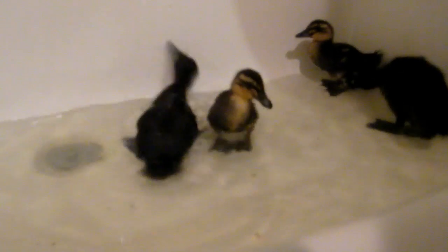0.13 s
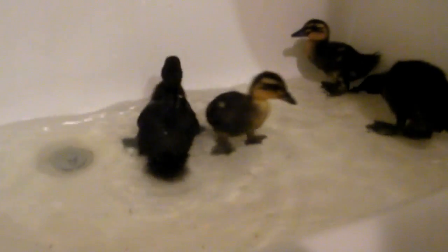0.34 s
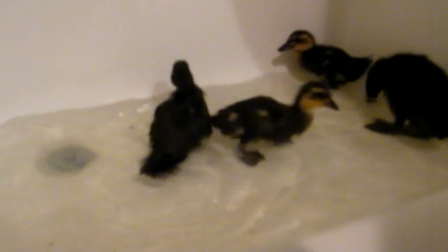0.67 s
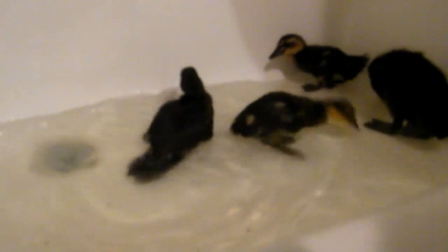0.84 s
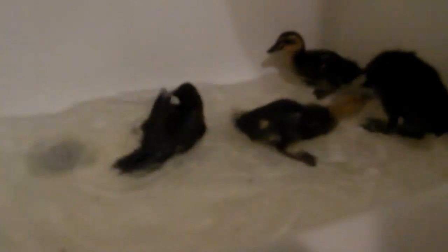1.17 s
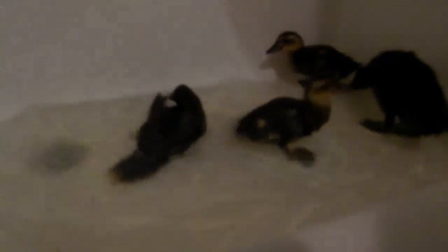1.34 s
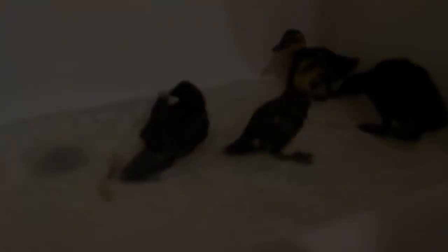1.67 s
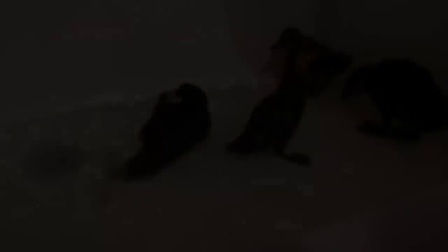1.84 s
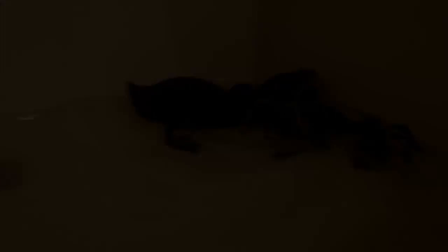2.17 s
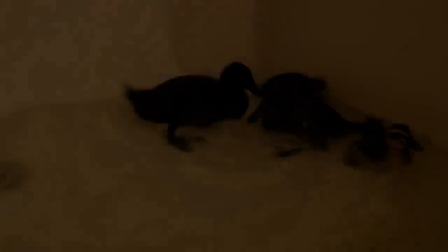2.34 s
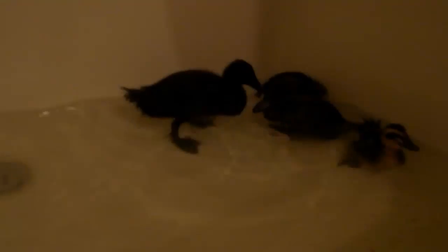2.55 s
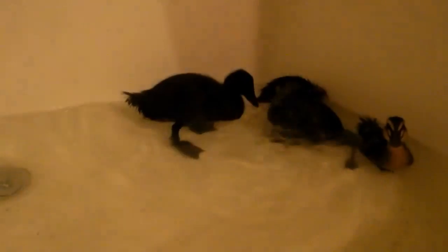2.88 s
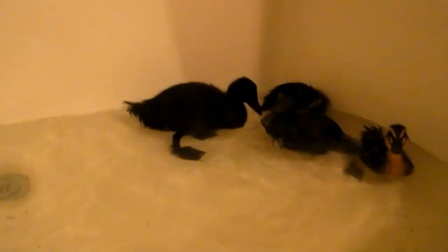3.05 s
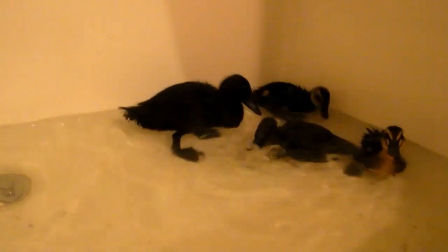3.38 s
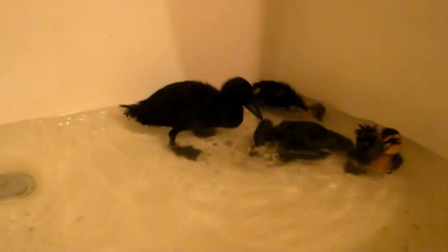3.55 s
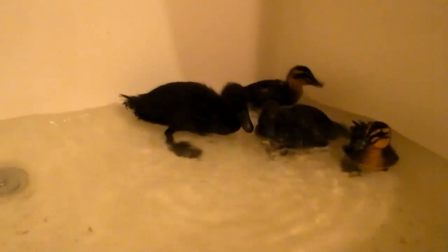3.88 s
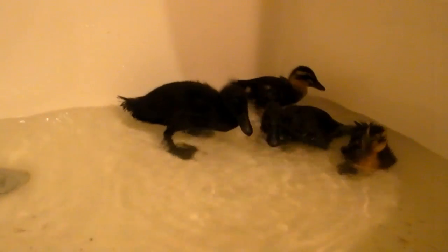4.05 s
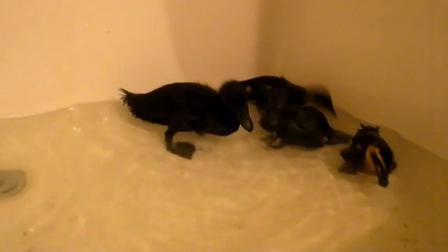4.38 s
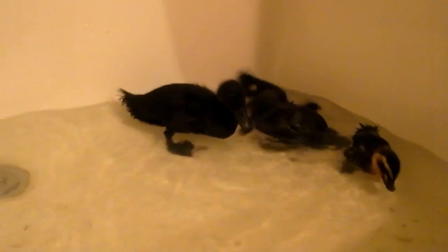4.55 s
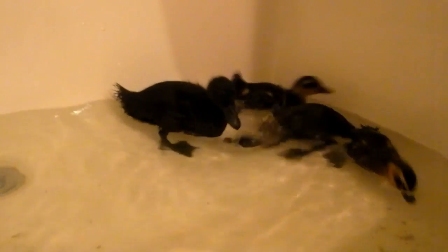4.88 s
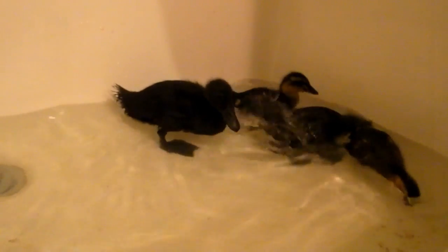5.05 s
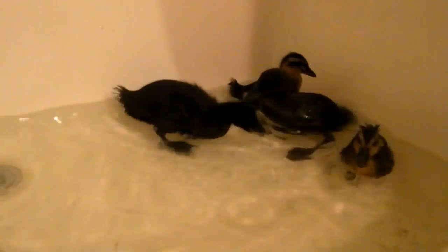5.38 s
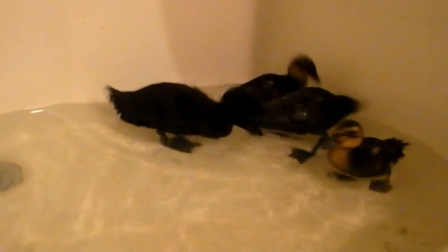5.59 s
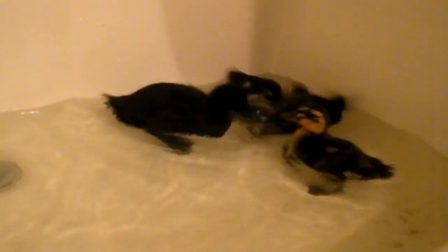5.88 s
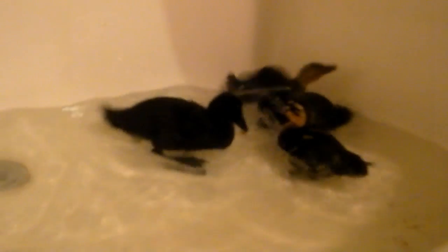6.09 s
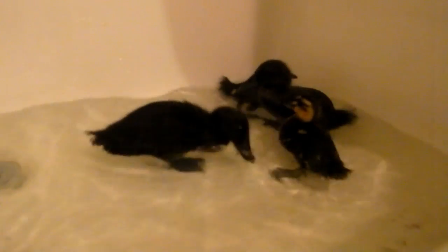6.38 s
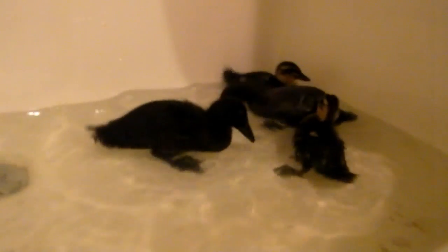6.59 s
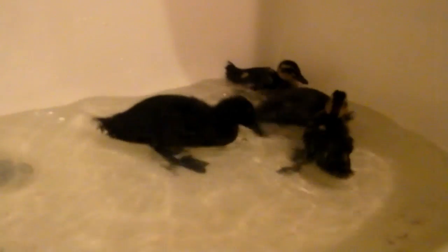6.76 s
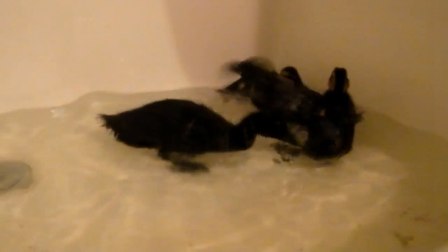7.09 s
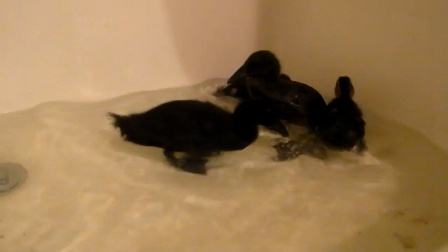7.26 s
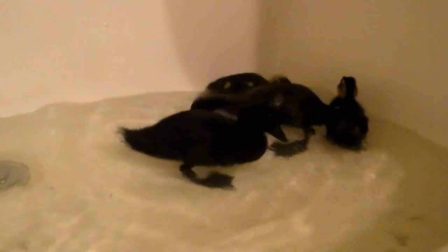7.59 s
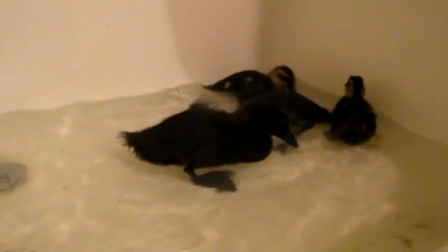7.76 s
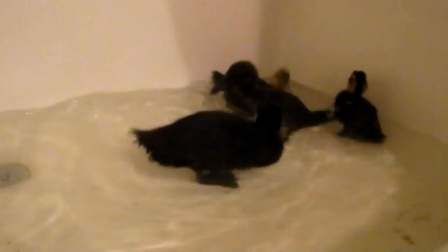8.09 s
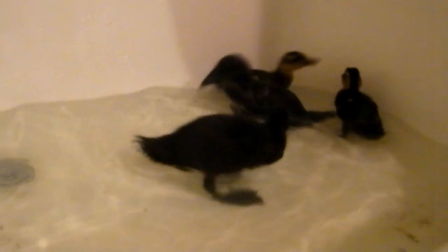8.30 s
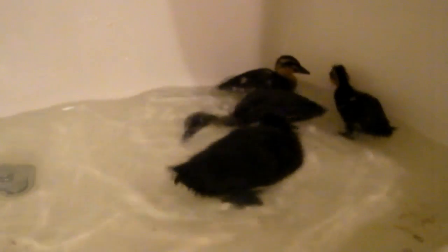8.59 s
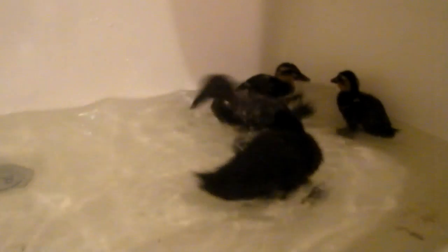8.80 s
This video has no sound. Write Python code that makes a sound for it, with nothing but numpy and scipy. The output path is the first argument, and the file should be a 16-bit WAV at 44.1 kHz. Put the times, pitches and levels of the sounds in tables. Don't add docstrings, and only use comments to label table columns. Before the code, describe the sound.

A bath tap gushes brightly into a shallow tub and fades out, then after a brief hush ducklings paddle with scattered drips, plops and splashes.

```python
import sys
import numpy as np
from scipy import signal
from scipy.fft import rfft, irfft
from scipy.io import wavfile

SR = 44100
rng = np.random.default_rng(int(sys.argv[2]) if len(sys.argv) > 2 else 0)


def makeup_ratio(level_db):
    decades = np.asarray(level_db, float) / 20
    return 10 ** decades


def dump_mix(stems):
    frames = np.atleast_2d(stems).T
    limited = np.clip(frames, -1, 1)
    pcm = np.round(limited * 32767).astype(np.int16)
    wavfile.write(sys.argv[1], SR, pcm)


N = 393813

# [t/s, level/dB]
STREAM_LEVEL = [
    (0.0, -15.5),
    (0.25, -18),
    (0.35, -19),
    (0.83, -20),
    (1.73, -30),
    (1.95, -39),
    (2.08, -55.5),
]
# [f/Hz, density/dB per Hz]
STREAM_COLOUR = [(35, -57), (60, -35.5), (96, -1.5), (130, -33), (160, -11), (398, -10), (458, -6),
                 (1200, -6), (1620, -8.5), (1950, -6.5), (2580, -5), (4220, -5), (4750, -4.5), (6000, 4),
                 (16000, -44)]
# [f/Hz, width/Hz, added level/dB]
TUB_RINGS = [(1650, 160, 0), (2520, 260, -3.5), (3960, 570, -2.5)]
# [t/s, peak level/dB, f/Hz]
STREAM_BUBBLES = [
    (0.146, -8.5, 2530),
    (0.163, -12.5, 2820),
    (0.318, -23, 3830),
    (0.544, -38, 1750),
    (0.733, -16, 1590),
    (0.832, -19, 3840),
    (1.396, -28, 1090),
]
# [t/s, peak level/dB, f/Hz]
STREAM_SPITS = [(0.0287, -11, 5990), (0.0471, -18, 5600), (0.059, -6.5, 5790), (0.0903, -8, 6380),
                (0.1173, -12.5, 6400), (0.198, -6, 6220), (0.2229, -9, 6200), (0.2389, -12, 6140),
                (0.2562, -11, 5800), (0.2704, -8, 6360), (0.297, -10, 5840), (0.3951, -19, 6020),
                (0.477, -8.5, 6250), (0.493, -23, 6150), (0.5036, -21, 6230), (0.5642, -18, 6450),
                (0.5765, -14, 6070), (0.5906, -9, 6180), (0.6251, -15, 6600), (0.654, -12.5, 6180),
                (0.7135, -11, 5670), (0.7428, -15, 6500), (0.7776, -27, 5820), (0.81, -15.0, 6100),
                (0.8323, -12, 5840), (0.861, -15.5, 5660), (0.9434, -20, 6020), (0.965, -17.5, 6000),
                (1.0398, -15, 5830), (1.1303, -11.5, 5570), (1.1974, -15, 5940), (1.2245, -14, 6300),
                (1.2433, -19.5, 5970), (1.3784, -14.5, 6300), (1.3943, -18, 6230), (1.409, -21, 6300),
                (1.4294, -17, 6340), (1.548, -17, 6180), (1.5696, -20, 5800), (1.6157, -22, 6160),
                (1.646, -25.5, 6550), (1.7598, -24, 6100), (1.8303, -25, 6270), (1.9974, -36, 6360)]
# [t/s, peak level/dB, f/Hz, ring/s]
BEADS = [(2.625, -25, 900, .012), (3.1303, -30, 6500, 0.0055), (3.2248, -35, 3540, 0.013),
         (3.355, -28.0, 6600, 0.0097), (3.4838, -13, 6000, 0.0072), (3.5054, -21, 5970, 0.0068),
         (3.594, -19.5, 5270, 0.0127), (3.57, -23, 2660, 0.0068), (3.6609, -25, 3630, 0.0068),
         (3.677, -16.5, 5650, 0.0034), (3.7044, -31, 3600, 0.016), (3.7596, -33, 1760, 0.016),
         (3.8209, -39.5, 1404, 0.025), (3.8636, -34, 2900, 0.0069), (4.0865, -20.5, 5170, 0.0063),
         (4.1807, -22.5, 7670, 0.0018), (4.2406, -35.0, 6600, 0.009), (4.3257, -44.5, 2940, 0.013),
         (4.4312, -31.5, 3860, 0.0046), (4.4831, -42.5, 6560, 0.0049), (4.5459, -48, 6520, 0.012),
         (4.6692, -20.5, 6610, 0.0055), (4.9204, -34, 2460, 0.017), (4.9589, -37, 6690, 0.0056),
         (5.011, -25, 6400, 0.0044), (5.0252, -41, 2970, 0.0058), (5.15, -45, 3180, 0.029),
         (5.2496, -35.5, 2080, 0.013), (5.2619, -33.5, 3630, 0.015), (5.365, -38.5, 3030, 0.02),
         (5.3966, -11, 7390, 0.004), (5.985, -29, 8800, 0.0037), (6.1161, -30, 2060, 0.013),
         (6.4437, -28, 8600, 0.0034), (6.8808, -8, 5930, 0.0028), (6.8965, -25, 3390, 0.0093),
         (6.9297, -20, 3760, 0.0044), (6.9885, -12, 3680, 0.0061), (7.0183, -39, 4430, 0.0099),
         (7.1115, -26, 2880, 0.0065), (7.197, -41, 3770, 0.0094), (7.584, -9, 6070, 0.0012),
         (7.7825, -39, 2160, 0.017), (8.039, -34, 1670, 0.0163), (8.123, -28.5, 2800, 0.0055),
         (8.2066, -35.0, 1410, 0.011), (8.6524, -37.0, 1560, 0.01), (8.6939, -39, 2145, 0.0164),
         (8.8218, -26.5, 3370, 0.005), (8.9072, -33, 2400, 0.0087)]
# [t/s, peak level/dB]
PRICKS = [(2.297, -38), (2.536, -40), (3.2055, -22), (3.4016, -9), (3.829, -35), (3.911, -32), (3.98, -37),
          (6.9665, -27), (8.079, -15), (8.28, -34), (8.424, -35), (8.651, -31), (8.711, -31), (2.6339, -40),
          (2.8404, -40), (2.8569, -40), (3.0076, -25), (3.5763, -30), (3.7454, -37), (3.7589, -21),
          (4.783, -22), (5.01, -25), (5.0639, -35), (5.0799, -15), (5.1422, -16), (5.4261, -28),
          (5.4425, -25), (5.473, -23), (5.6226, -40), (5.8965, -27), (6.1035, -22), (6.1444, -24),
          (6.343, -40), (6.3859, -17), (6.4173, -19), (6.6588, -44), (6.8799, -10), (6.9264, -32),
          (7.1038, -25), (7.886, -34), (8.695, -28), (8.9141, -25)]
# [t/s, level/dB]
ROOM_LEVEL = [
    (2.17, -65),
    (2.7, -54),
    (3.3, -48),
    (4.6, -45.5),
    (8.93, -44.5),
]
# [f/Hz, level/dB]
WHINE = [(7732, -7), (15464, -17)]
# [f/Hz, density/dB per Hz]
HISS_COLOUR = [(100, 10), (978, 1), (2500, -19), (4600, -33), (5860, -6.5), (7900, -5), (8600, -19.5),
               (15300, -32)]
# [f/Hz, density/dB per Hz]
RUMBLE_COLOUR = [(8.8, -39), (15, 5.5), (54, 4), (91, 14.5), (124, -54), (156, -8), (200, -31), (260, -105)]
# [t/s, level/dB]
STIR_LEVEL = [(2.17, -70.5), (2.24, -45.5), (2.4, -63), (2.77, -43), (2.98, -49), (3.26, -35), (3.71, -31),
              (3.9, -51), (4.62, -48), (5.0, -33), (5.75, -36.5), (6.1, -30.5), (6.6, -60), (7.0, -25),
              (7.3, -50.5), (8.0, -47), (8.5, -51.5), (8.93, -38.5)]
# [f/Hz, density/dB per Hz]
RIPPLE_COLOUR = [(500, -25), (800, 0), (1500, 7), (3000, 8.5), (4500, 3.5), (5500, 8.5)]
# [f/Hz, density/dB per Hz]
FIZZ_COLOUR = [(2470, -34), (4200, -5), (4840, 15), (5180, -48), (6040, 21.5), (7240, 8), (13200, -12),
               (16300, -3)]
# [t/s, peak level/dB, f/Hz, ring/s]
BIG_BUBBLES = [(2.169, -44, 946, 0.016), (2.258, -40, 1110, 0.026), (2.615, -19, 968, 0.02),
               (3.003, -19, 1233, 0.0068), (3.403, -20.5, 1340, 0.0046), (3.491, -23.5, 1018, 0.018),
               (3.631, -35, 990, 0.037), (4.637, -11.5, 1110, 0.045), (4.934, -9, 783, 0.0064),
               (5.026, -21.5, 987, 0.02), (5.064, -9, 850, 0.0049), (3.674, -29, 1086, 0.031),
               (5.134, -17.5, 1310, 0.01), (5.507, -24, 1273, 0.016), (5.655, -12, 920, 0.0017),
               (5.852, -7, 697, 0.004), (5.969, -13, 831, 0.028), (6.387, -16.5, 1350, 0.0026),
               (6.474, -9, 1193, 0.023), (6.82, -22, 760, 0.0082), (6.841, -22, 1112, 0.054),
               (6.929, -14, 1690, 0.012), (6.987, -12, 1208, 0.032), (7.581, -14, 1126, 0.0038),
               (7.809, -10, 867, 0.0018), (8.036, -22.5, 950, 0.0061), (8.072, -13.5, 1490, 0.0039),
               (8.241, -16.5, 1350, 0.0041), (8.589, -19, 817, 0.016), (8.8915, -10.5, 1023, 0.012)]
# [t/s, peak level/dB, f/Hz, length/s]
SHOVES = [(2.244, -22, 5570, 0.033), (4.917, -28, 480, 0.09), (5.066, -32, 460, 0.12),
          (5.1, -34, 171, 0.037), (5.654, -22, 1540, 0.054), (5.847, -22, 510, 0.097),
          (5.85, -33.5, 164, .07), (5.862, -26.5, 300, 0.089), (6.825, -18.5, 294, 0.096),
          (6.829, -27.5, 170, 0.041), (6.846, -14, 670, 0.065), (7.349, -36.5, 153, 0.0432),
          (7.598, -22, 1090, 0.08), (7.696, -35.5, 239, 0.0378), (7.708, -30.5, 150, 0.043),
          (7.804, -15, 880, 0.11), (7.815, -22, 376, .12), (8.076, -13, 3370, 0.13),
          (8.12, -32.5, 156, 0.05), (8.122, -29, 336, .06), (8.587, -17, 490, 0.1), (8.59, -24, 300, .055),
          (8.661, -22.5, 316, 0.14), (8.666, -21, 750, 0.11), (8.668, -26, 1720, 0.039)]
# [t/s, peak level/dB, f/Hz, ring/s]
DROPS = [(2.219, -33, 1710, 0.0094), (2.8435, -23, 4000, 0.0045), (3.046, -30, 3830, 0.011),
         (3.083, -27.5, 2900, 0.013), (3.346, -21.5, 4300, .009), (3.4022, 4.5, 4100, 0.0016),
         (3.487, -15, 2730, 0.0054), (4.124, -16, 3100, 0.0027), (4.138, -23.5, 2086, 0.021),
         (4.208, -28.5, 1660, 0.032), (4.2162, -19, 3730, 0.0063), (4.4, -24, 3730, 0.009),
         (4.587, -31, 1910, 0.01), (4.8027, -11.5, 3570, 0.0025), (4.9012, -13, 3900, 0.0051),
         (4.9894, -25, 3880, .009), (5.339, -24.5, 4560, 0.023), (5.5065, -19, 2345, 0.027),
         (5.8974, -23.5, 2740, 0.014), (6.0769, -27.5, 2250, 0.022), (6.169, -25.5, 2450, 0.04),
         (6.4727, -8.5, 1740, 0.0073), (6.637, -29.5, 1684, 0.022), (7.272, -32, 2070, 0.011),
         (7.5833, -18.5, 1560, 0.0084), (7.9548, -10.5, 2215, 0.017), (8.829, -21.5, 2250, 0.038),
         (8.8935, -2.5, 2100, 0.0047)]
# [t/s, peak level/dB, f/Hz]
SPATTERS = [(3.0036, -38, 2030), (3.292, -15.5, 4560), (3.5697, -24, 2840), (3.634, -24, 2360),
            (3.6604, -15, 4600), (3.761, -20, 2880), (4.6387, -31, 1970), (8.312, -25, 5300),
            (8.33, -25, 5000), (5.506, -15, 3870), (5.6609, -27, 1830), (5.9585, -22, 4780),
            (6.112, -21, 3690), (6.385, -19.5, 4260), (6.818, -42, 2000), (6.8526, -20.5, 1490),
            (6.882, -13, 4860), (6.926, -18.5, 1720), (6.9848, -7.5, 3230), (7.1039, -26.5, 3080),
            (7.61, -23.5, 1690), (7.807, -31, 1920), (8.0693, -28, 2670), (8.126, -27, 2930),
            (8.2417, -34, 1980), (8.585, -28.5, 1800), (8.822, -24.5, 3140)]
# [t/s, peak level/dB, f/Hz]
DROPLETS = [(2.646, -31.5, 6020), (2.754, -22.5, 6500), (3.0095, -25, 5630), (3.203, -20, 5500),
            (3.2845, -23.5, 5500), (3.4867, -16.5, 5820), (3.573, -16, 5700), (3.594, -29, 5070),
            (3.674, -17.5, 5060), (3.8564, -19.5, 6240), (4.0762, -19, 5400), (4.283, -24, 5470),
            (4.67, -26, 6750), (5.012, -30, 6200), (5.105, -20, 6560), (5.1428, -16.5, 5800),
            (5.267, -26, 5600), (5.506, -15.5, 5940), (6.074, -31, 5100), (6.1128, -17, 5880),
            (6.42, -10.5, 5400), (6.471, -31, 6340), (6.947, -15, 5960), (7.011, -22, 6360),
            (7.11, -21.5, 6060), (7.888, -27, 7500), (8.3056, -25, 5900), (8.8405, -16.5, 6300),
            (8.891, -19, 5640)]
# [t/s, peak level/dB, f/Hz, snap level/dB]
BURSTS = [(2.762, -19, 6100, -31), (3.113, -25, 6550, -23.5), (3.382, -15.5, 5510, -21),
          (3.4, -31.5, 5000, -23), (3.6578, -17, 6400, -18.5), (4.636, -23, 5700, -27),
          (4.8993, -20, 5500, -23.5), (5.3432, -18.5, 5600, -31), (5.3962, -17.5, 6500, -49),
          (5.6585, -17.5, 5730, -21.5), (5.9962, -16.5, 6350, -23), (6.383, -16, 6200, -28),
          (6.687, -29.5, 6100, -29.5), (6.8606, -38, 6360, -37), (6.877, -11, 5780, -23),
          (6.9863, -26, 5570, -23.5), (7.583, -18, 5400, -26.5), (7.77, -24.5, 6400, -44),
          (7.953, -29.5, 4900, -31), (8.0706, -11, 6420, -24), (8.798, -33, 7200, -27.5)]
# [t/s, peak level/dB]
SNAPS = [(2.2446, -36), (3.099, -37), (3.1921, -31), (3.2926, -24.5), (3.853, -24), (4.1229, -35),
         (4.18, -34), (4.3034, -33), (5.81, -34), (5.9823, -31), (7.242, -32.5), (8.2425, -37),
         (8.494, -51), (8.572, -34)]
# [t/s, length/s, start f/Hz, end f/Hz, peak level/dB]
GLIDES = [(2.211, 0.012, 1220, 3840, -44), (3.213, 0.056, 1867, 2205, -35), (3.248, 0.032, 2290, 1740, -35),
          (5.132, 0.052, 1177, 1690, -35.5), (5.24, 0.006, 1870, 3570, -34),
          (5.513, 0.0078, 3000, 4900, -24), (5.968, 0.038, 763, 1234, -24.5),
          (7.96, 0.028, 2385, 2840, -31.5), (8.776, 0.025, 1260, 1990, -36),
          (5.788, 0.015, 4090, 4150, -40), (5.513, 0.051, 2230, 2300, -36),
          (5.954, 0.013, 1970, 4470, -31.5), (6.843, 0.027, 1300, 1740, -29),
          (5.809, 0.0035, 8500, 9000, -35), (5.997, 0.0029, 7600, 9200, -24),
          (2.849, .012, 3670, 4560, -37), (4.074, 0.0044, 5160, 5250, -23), (2.598, 0.01, 1510, 1450, -50),
          (5.165, 0.06, 1480, 1700, -40), (6.0, 0.028, 1110, 1310, -34), (7.123, 0.04, 2560, 2640, -47),
          (8.125, .06, 2700, 3050, -39), (8.006, .008, 8100, 9200, -39), (8.832, 0.018, 1020, 1550, -38),
          (8.869, 0.012, 990, 1220, -32.5), (8.871, 0.0088, 2900, 3010, -37)]
# [f/Hz, time to fall 60 dB/s]
ECHO_T60 = [(200, 0.57), (1000, 0.21), (3000, 0.28), (6000, 0.33), (9000, 0.23), (13000, 0.26)]

STREAM_ENDS_S, DUCKLINGS_START_S = 2.082, 2.166
BEAD_SWELL_SHARE = 0.2
SPIT_RING_S, SPIT_DB = 0.007, -4
RIPPLE_DB, FIZZ_DB, FIZZ_FOLLOWS = -10, -6.5, 0.78
RIPPLE_WAKE_DB, FIZZ_WAKE_DB = -36, -26
WAKE_RISE_S, WAKE_DIES_S = 0.0063, 0.056
DROPLET_CYCLES, BURST_CYCLES = 28, 13.5
TICKS_PER_S, TICK_DB, TICK_SPREAD_DB = 22.0, -53, 4.0
FLUTTER_S, FLUTTER_DB, FLUTTER_SHARE = 0.005, 3.5, 0.025


def rms_one(x):
    return x / np.sqrt(np.mean(x ** 2) + 1e-20)


def in_time(rows):
    s, *columns = np.transpose(rows)
    return [np.interp(np.arange(N) / SR, s, column) for column in columns]


def at_hz(points, hz):
    points_hz, values = np.transpose(points)
    return np.interp(np.log(hz), np.log(points_hz), values)


def coloured(spectrum):
    hz = np.arange(N // 2 + 1) * SR / N + 1
    white = rfft(rng.standard_normal(N))
    return rms_one(irfft(white * makeup_ratio(at_hz(spectrum, hz)), N))


def drift(rate):
    knots = rng.standard_normal(400)
    return np.interp(np.arange(N) / SR * rate, np.arange(400), knots)


def add(out, s, sound):
    i = round(s * SR)
    out[i:i + len(sound)] += sound[:N - i]


def tub(x, wet_db, build_s=0.0004):
    t = np.arange(SR // 2) / SR
    hz, frame_s, cells = signal.stft(rng.standard_normal(len(t)), SR, nperseg=128)
    decay_db = -60 * frame_s / at_hz(ECHO_T60, hz + 1)[:, None]
    tail = signal.istft(cells * makeup_ratio(decay_db), SR)[1][:len(t)]
    tail = tail * np.clip(t / build_s, 0, 1)
    tail = tail / np.sqrt(np.sum(tail ** 2))
    return x + makeup_ratio(wet_db) * signal.fftconvolve(x, tail)[:len(x)]


def froth(spectrum, per_s, cycles, spread_db, wet_db, count=30, size=N, biggest=4.36):
    sizes = makeup_ratio(spread_db * np.minimum(rng.exponential(1, size), biggest))
    sizes = sizes * rng.choice([-1, 1], size)
    born = rng.random(size) < per_s * makeup_ratio(3.0 * drift(30)[:size]) / SR
    dealt = rng.integers(0, count, size)
    out = 0
    for k, hz in enumerate(np.geomspace(spectrum[0][0], spectrum[-1][0], count)):
        r = makeup_ratio(-60 * hz / (cycles * SR))
        w = 2 * np.pi * hz / SR
        resonance = [0, np.sin(w), 0, 1, -2 * r * np.cos(w), r * r]
        rings = signal.sosfilt([resonance, resonance], sizes * born * (dealt == k) + 1e-18)
        out = out + rings * hz ** 2 * makeup_ratio(at_hz(spectrum, hz))
    return rms_one(tub(out, wet_db))


def bubble(peak_db, hz, ring_s, rise=0.04):
    ring_s = np.clip(ring_s, 0.001, 0.2)
    t = np.arange(round(ring_s * SR * 2)) / SR
    swell = np.sin(np.pi / 2 * np.clip(t / (0.00019 + 1.15 / hz), 0, 1)) ** 2
    cycles = hz * (t + rise * t ** 2 / (2 * ring_s))
    return makeup_ratio(peak_db) * swell * makeup_ratio(-30 * t / ring_s) * np.sin(2 * np.pi * cycles)


def tap():
    level_db, = in_time(STREAM_LEVEL)
    quarter = N // 4
    water = froth(STREAM_COLOUR, per_s=4000, cycles=14, spread_db=3, wet_db=-2,
                  count=64, size=quarter, biggest=2.7)
    water = np.pad(water, (0, N - quarter)) + makeup_ratio(-8) * coloured(STREAM_COLOUR)
    water += sum(makeup_ratio(db) * signal.lfilter(*signal.iirpeak(hz, hz / width_hz, SR), water)
                 for hz, width_hz, db in TUB_RINGS)
    gusts = makeup_ratio(2.2 * drift(9.7) + 4.6 * drift(45))
    airy = signal.butter(2, 10500, "high", fs=SR, output="sos")
    water += makeup_ratio(-17.5) * gusts * signal.sosfilt(airy, rng.standard_normal(N))
    water *= gusts ** 0.15
    louder = np.zeros(N)
    for s, db, hz in STREAM_BUBBLES:
        add(louder, s, bubble(db, hz, ring_s=0.011))
    return makeup_ratio(level_db - 5.5) * water + tub(louder, wet_db=4.5)


def beads():
    out = np.zeros(N)
    spits = [(s, db + SPIT_DB, hz, SPIT_RING_S) for s, db, hz in STREAM_SPITS]
    for s, db, hz, ring_s in BEADS + spits:
        t = np.arange(round(np.clip(ring_s, 0.001, 0.1) * SR * 2)) / SR
        rise = t / (BEAD_SWELL_SHARE * ring_s)
        add(out, s - 0.0006, makeup_ratio(db) * rise * np.exp(1 - rise) * np.sin(2 * np.pi * hz * t))
    click = np.eye(1, 64)[0]
    prick = signal.sosfilt(signal.butter(2, [5000, 14000], "band", fs=SR, output="sos"), click)
    for s, db in PRICKS:
        add(out, s, makeup_ratio(db + 5) * prick)
    return tub(out, wet_db=-8, build_s=0.017)


def room_tone():
    level_db, = in_time(ROOM_LEVEL)
    t = np.arange(N) / SR
    whine = sum(np.sqrt(2) * makeup_ratio(db) * np.sin(2 * np.pi * hz * t) for hz, db in WHINE)
    hiss = makeup_ratio(-3) * coloured(HISS_COLOUR)
    return makeup_ratio(level_db - 7) * coloured(RUMBLE_COLOUR) + makeup_ratio(level_db) * (whine + hiss)


def wake(events, under_db):
    kicks = np.zeros(N)
    for s, db, *_ in events:
        kicks[round(s * SR)] += makeup_ratio(db + under_db)
    for time_s in (WAKE_RISE_S, WAKE_DIES_S):
        r = np.exp(-1 / (time_s * SR))
        kicks = signal.lfilter([1 - r], [1, -r], kicks + 1e-18)
    return kicks * WAKE_DIES_S * SR


def stirred_water():
    ripple = froth(RIPPLE_COLOUR, per_s=3500, cycles=15, spread_db=4.5, wet_db=-3, count=24)
    fizz = froth(FIZZ_COLOUR, per_s=3000, cycles=11, spread_db=2.8, wet_db=-3, count=18)
    stir_db, = in_time(STIR_LEVEL)
    fizz_db = FIZZ_FOLLOWS * (stir_db + 46.5) - 49.5 + FIZZ_DB
    ripple_gain = makeup_ratio(stir_db + RIPPLE_DB) + wake(SPATTERS + SHOVES, RIPPLE_WAKE_DB)
    fizz_gain = makeup_ratio(fizz_db) + wake(DROPLETS + BURSTS, FIZZ_WAKE_DB)
    return ripple_gain * ripple + fizz_gain * fizz


def splash(peak_db, hz, ring_s, spray_db, octaves, spread_s, cycles=12.7, fade_db=16.0, count=7):
    out = np.zeros(SR // 2)
    add(out, 0, bubble(peak_db, hz, ring_s))
    for late, detune, size in rng.random((count, 3)):
        spray_hz = np.clip(hz * 2 ** (octaves * (2 * detune - 0.8)), 120, 9000)
        db = peak_db + spray_db - fade_db * late - 7 * size
        add(out, spread_s * late ** 1.5, bubble(db, spray_hz, cycles / spray_hz))
    return out


def film_snaps():
    out = np.zeros(N)
    snaps = SNAPS + [(s, snap_db) for s, _, _, snap_db in BURSTS]
    first_s, span_s = 2.6, 6.2
    when, size = rng.random((round(TICKS_PER_S * span_s), 2)).T
    tick_db = TICK_DB - TICK_SPREAD_DB * np.log(1 - 0.95 * size)
    snaps = snaps + list(zip(first_s + span_s * when, tick_db))
    shape = makeup_ratio(-30 * abs(np.arange(200) - 30) / (0.0022 * SR))
    puffs = rng.standard_normal((len(snaps), 200)) * shape
    film = signal.butter(2, [3500, 13000], "band", fs=SR, output="sos")
    for (s, db), puff in zip(snaps, signal.sosfilt(film, puffs)):
        add(out, s - 0.0007, makeup_ratio(db + 1.5) * puff)
    return out


def paddling():
    out, fine = np.zeros((2, N))
    for s, db, hz, ring_s in BIG_BUBBLES:
        add(out, s, splash(db + 0.5, hz, ring_s, spray_db=-8, octaves=0.7, spread_s=0.06))
    for s, db, hz, length_s in SHOVES:
        add(out, s, splash(db, hz, 2.5 / hz, spray_db=2, octaves=0.42, spread_s=1.1 * length_s,
                           cycles=5.8, fade_db=10.5, count=22))
    for s, db, hz, ring_s in DROPS:
        add(out, s, splash(db - 2, hz, ring_s, spray_db=-5.5, octaves=0.66, spread_s=0.029))
    for s, db, hz in SPATTERS:
        add(out, s, splash(db - 2.5, hz, ring_s=0.0064, spray_db=10, octaves=0.68, spread_s=0.05))
    for s, db, hz in DROPLETS:
        add(fine, s, splash(db, hz, DROPLET_CYCLES / hz, spray_db=4, octaves=0.32, spread_s=0.04, cycles=21))
    for s, db, hz, _ in BURSTS:
        add(fine, s, splash(db + 8, hz, BURST_CYCLES / hz, spray_db=5.5, octaves=0.37,
                            spread_s=0.042, cycles=6.6))
    near = film_snaps()
    close_by = tub(fine + 0.8 * near, wet_db=-1, build_s=0.0013) + 0.32 * near
    return tub(out, wet_db=-3, build_s=0.012) + close_by


def pockets():
    out = np.zeros(N)
    flutters = rng.standard_normal((len(GLIDES), 2, 24))
    for (s, length_s, start_hz, end_hz, db), flutter in zip(GLIDES, flutters):
        t = np.arange(round(length_s * SR)) / SR
        swell, waver = (np.interp(t / FLUTTER_S, np.arange(24), knots) for knots in flutter)
        pitch_hz = start_hz * (end_hz / start_hz) ** (t / length_s) * (1 + FLUTTER_SHARE * waver)
        shape = makeup_ratio(db + FLUTTER_DB * swell) * np.sin(np.pi * t / length_s) ** 0.5
        add(out, s, shape * np.sin(2 * np.pi * np.cumsum(pitch_hz) / SR))
    return tub(out, wet_db=-3, build_s=0.012)


def scene():
    t = np.arange(N) / SR
    stream = tap() * (t < STREAM_ENDS_S)
    small_sounds = beads()
    ducklings = (room_tone() + stirred_water() + paddling()) * (t >= DUCKLINGS_START_S)
    heard = stream + small_sounds + ducklings + pockets()
    notch_hz, notch_width_hz = 4840, 400
    b, a = signal.iirpeak(notch_hz, notch_hz / notch_width_hz, SR)
    heard = heard - signal.lfilter(b, a, heard)
    return 2 * heard * [[1], [0]]


def roll_off(x):
    return signal.sosfilt(signal.butter(12, 16450, fs=SR, output="sos"), x)


def record(dry):
    top_cut = signal.cheby2(12, 50, 15900, fs=SR, output="sos")
    mix = np.clip(signal.sosfilt(top_cut, dry), -1, 1)
    return roll_off(mix)


dry = scene()
out = record(dry)
dump_mix(out)
```